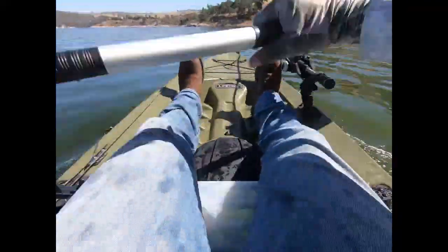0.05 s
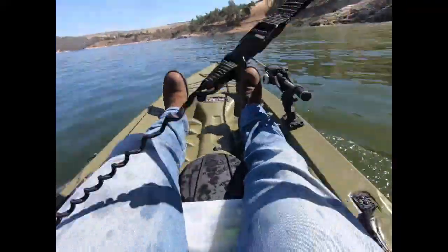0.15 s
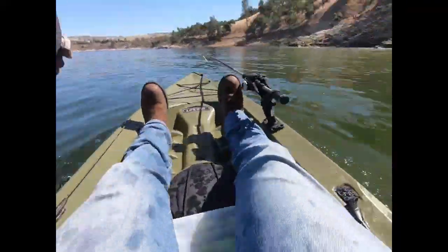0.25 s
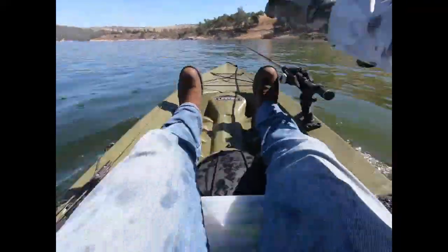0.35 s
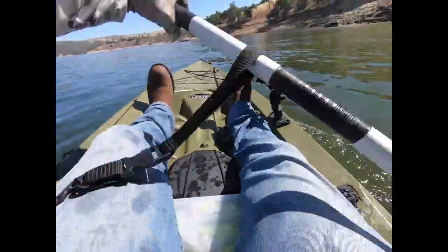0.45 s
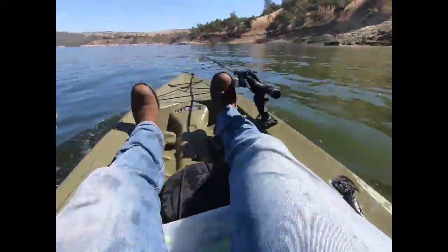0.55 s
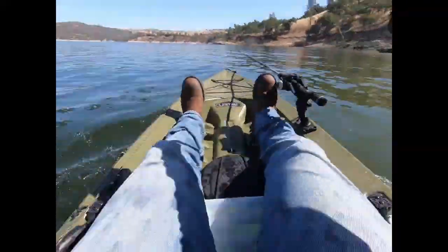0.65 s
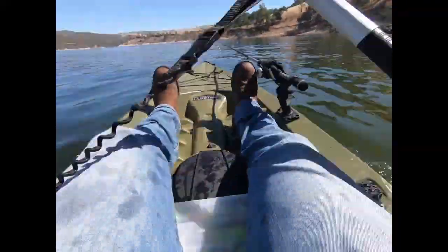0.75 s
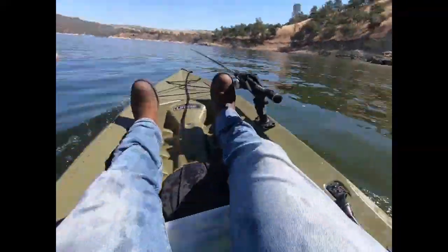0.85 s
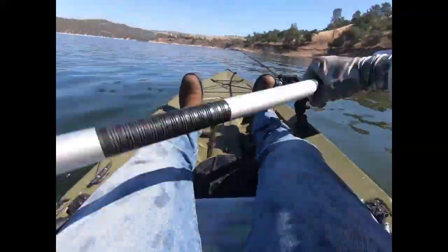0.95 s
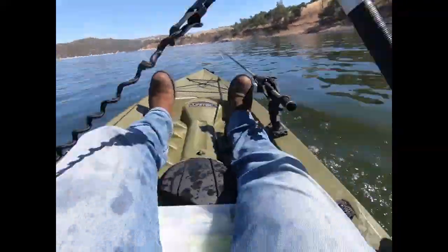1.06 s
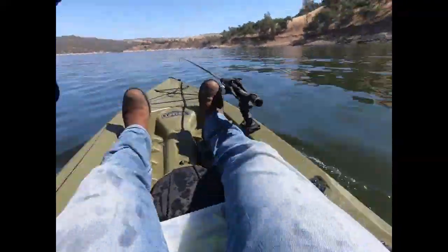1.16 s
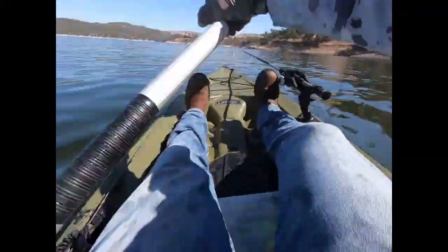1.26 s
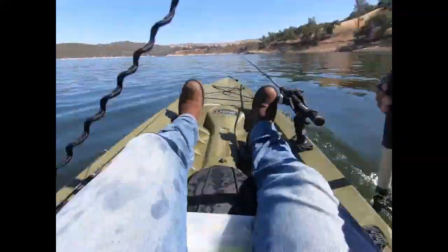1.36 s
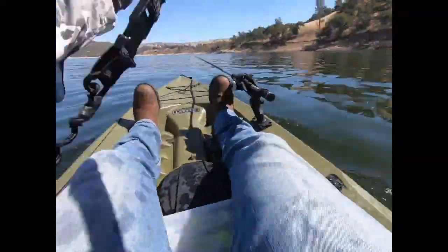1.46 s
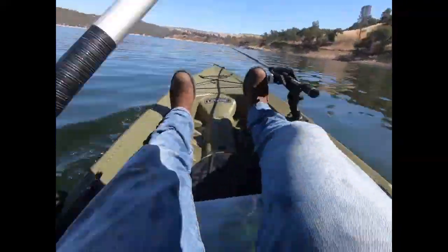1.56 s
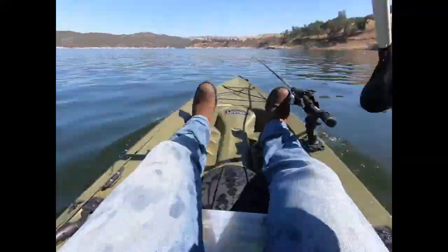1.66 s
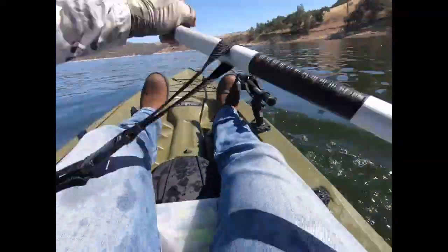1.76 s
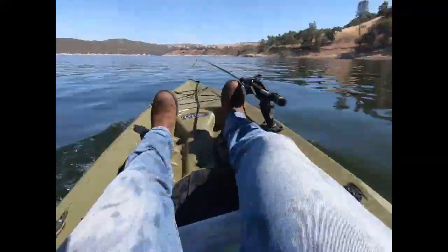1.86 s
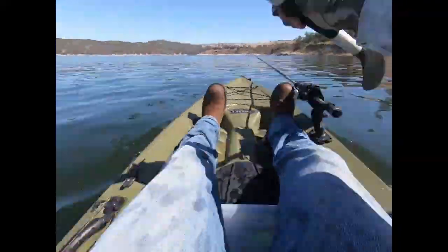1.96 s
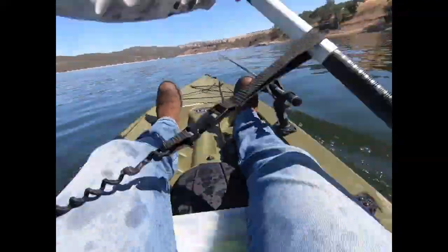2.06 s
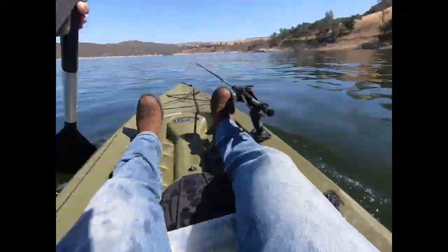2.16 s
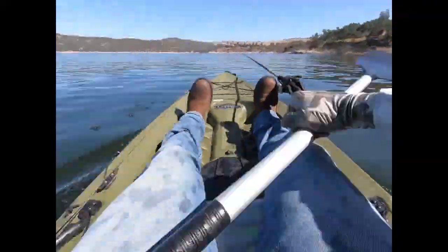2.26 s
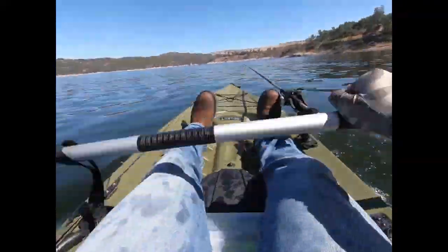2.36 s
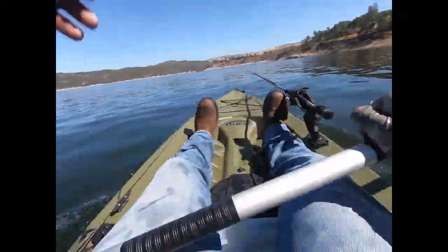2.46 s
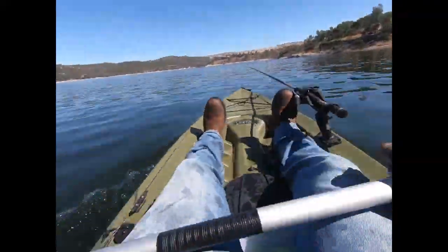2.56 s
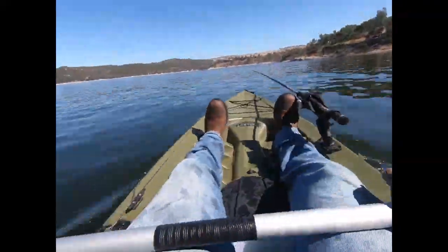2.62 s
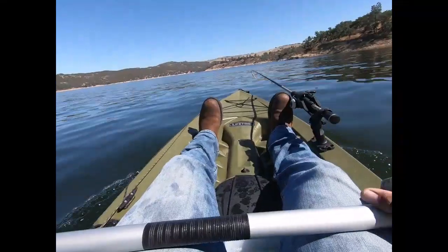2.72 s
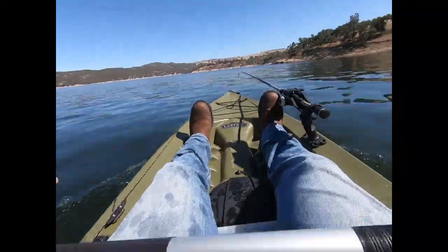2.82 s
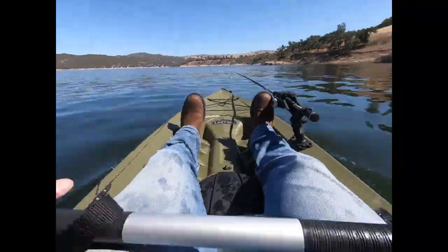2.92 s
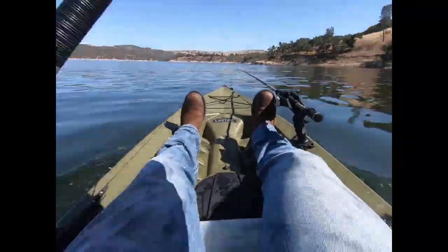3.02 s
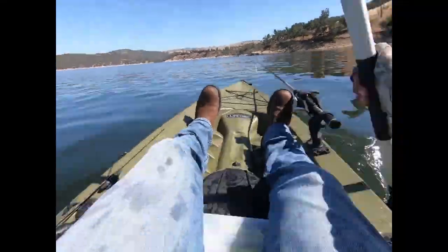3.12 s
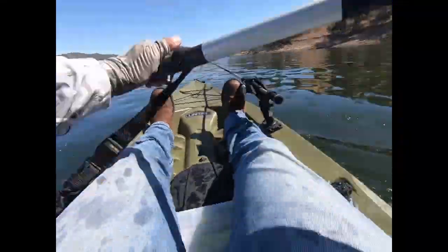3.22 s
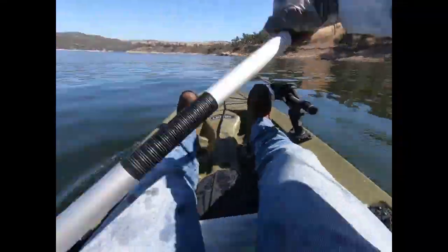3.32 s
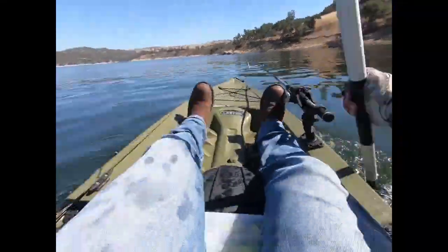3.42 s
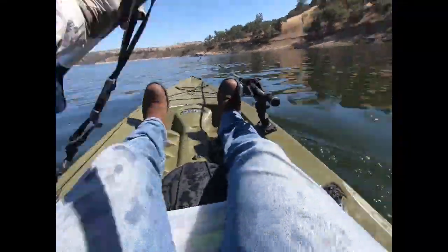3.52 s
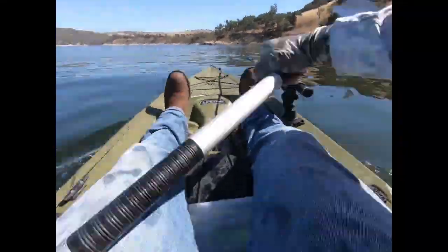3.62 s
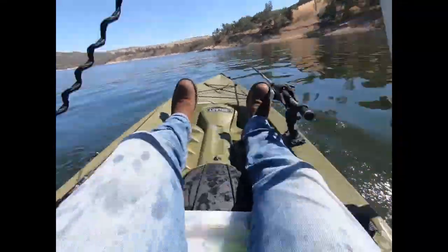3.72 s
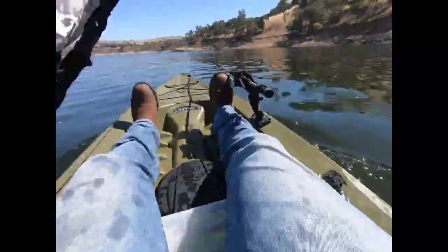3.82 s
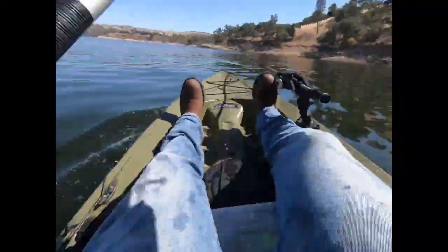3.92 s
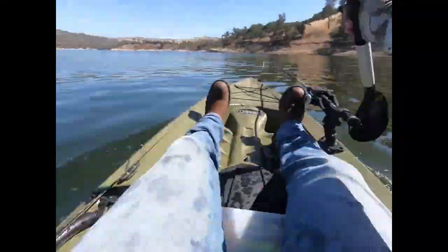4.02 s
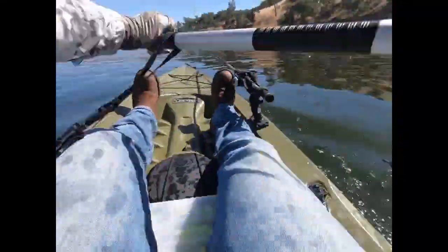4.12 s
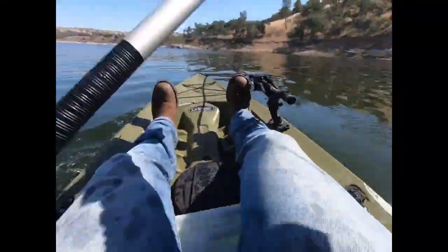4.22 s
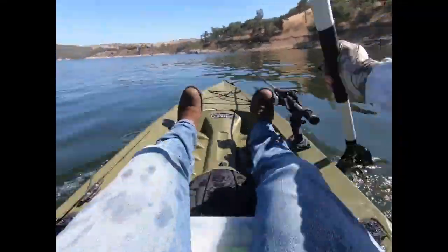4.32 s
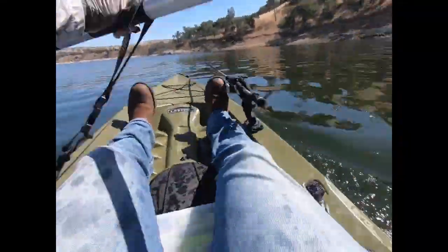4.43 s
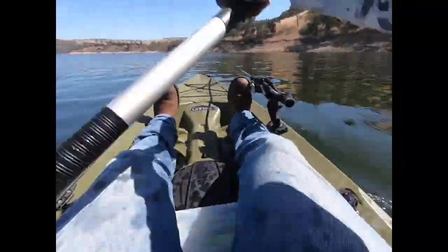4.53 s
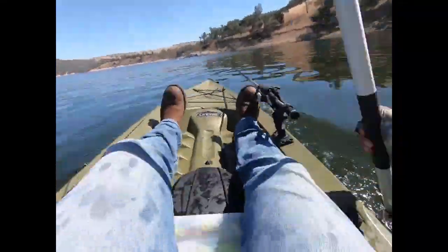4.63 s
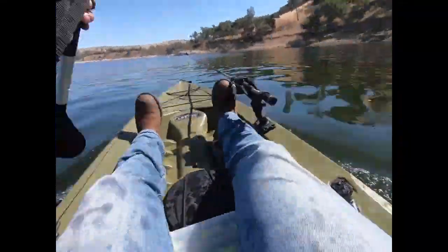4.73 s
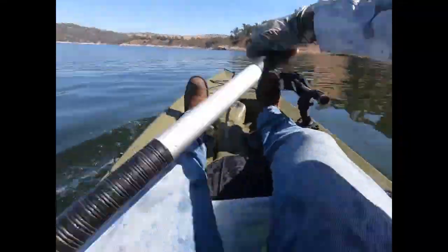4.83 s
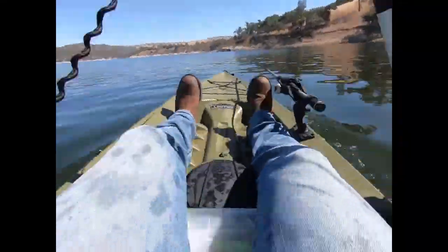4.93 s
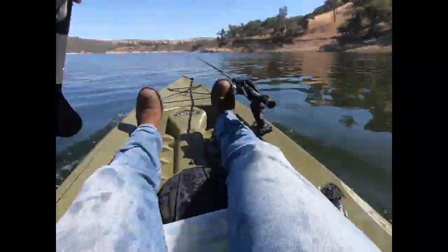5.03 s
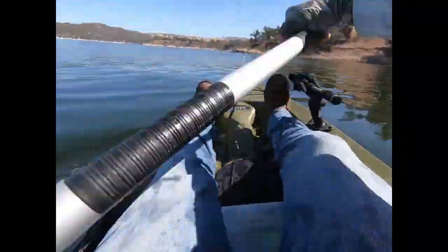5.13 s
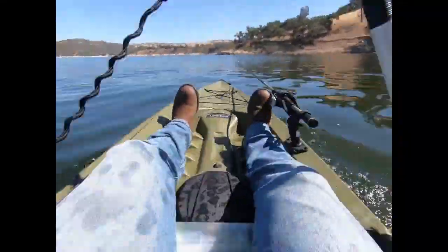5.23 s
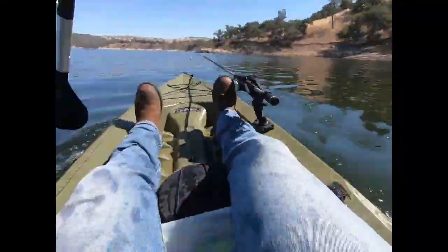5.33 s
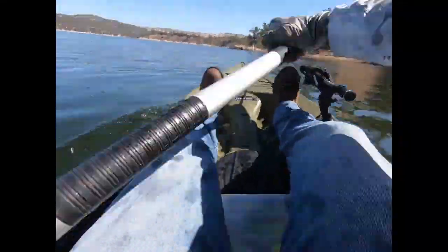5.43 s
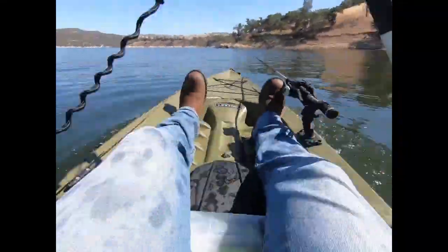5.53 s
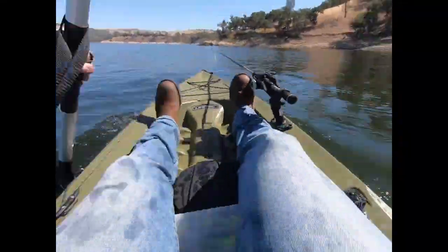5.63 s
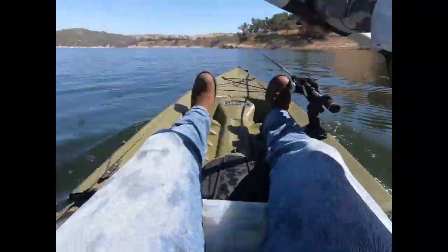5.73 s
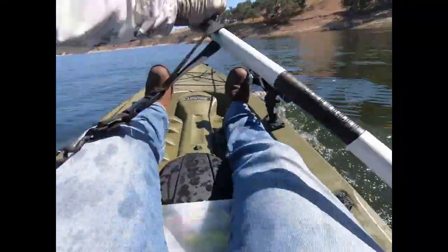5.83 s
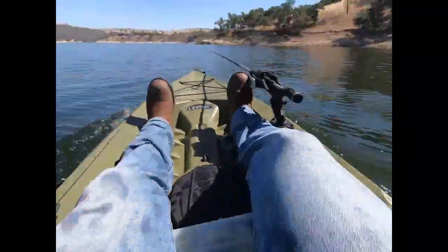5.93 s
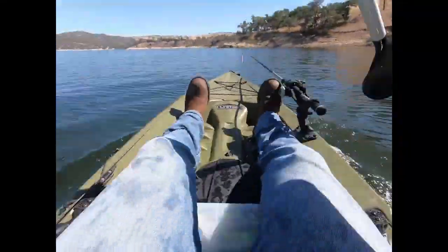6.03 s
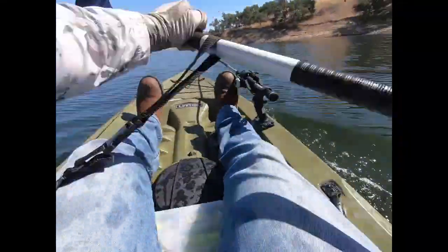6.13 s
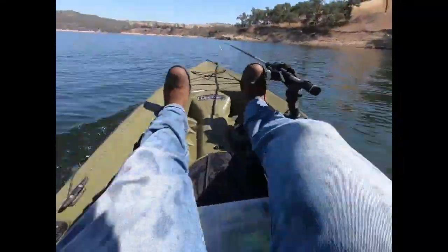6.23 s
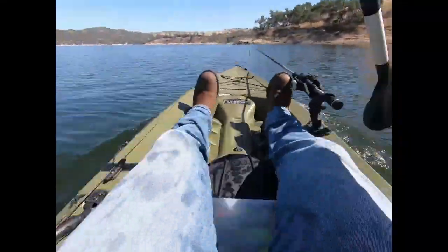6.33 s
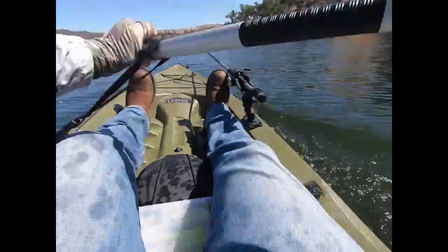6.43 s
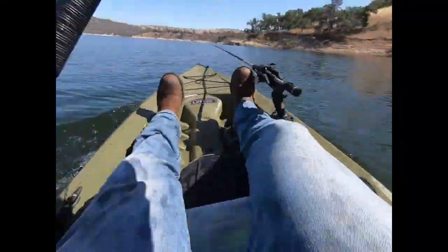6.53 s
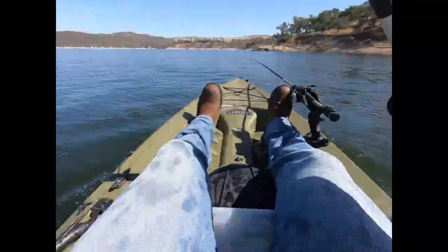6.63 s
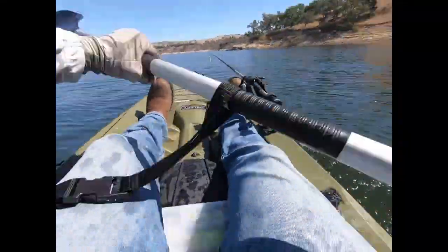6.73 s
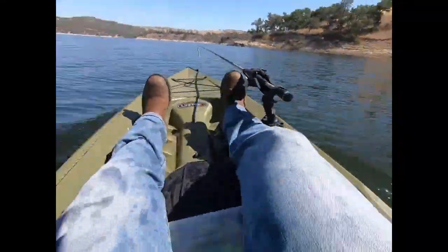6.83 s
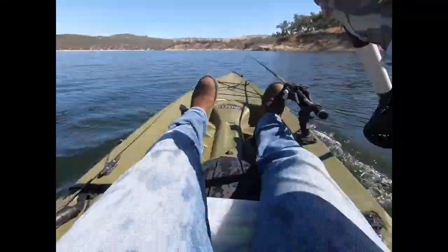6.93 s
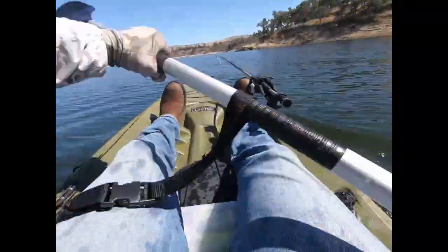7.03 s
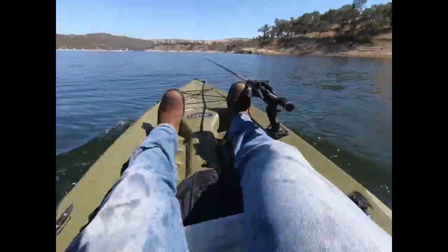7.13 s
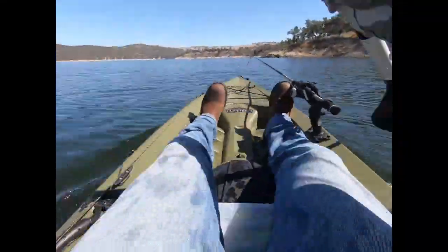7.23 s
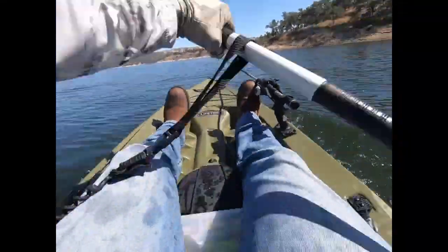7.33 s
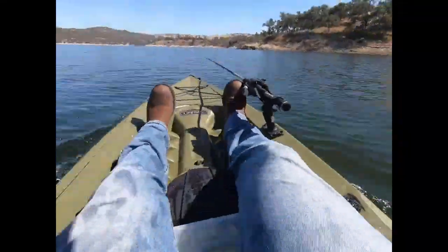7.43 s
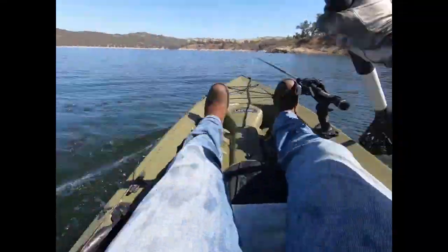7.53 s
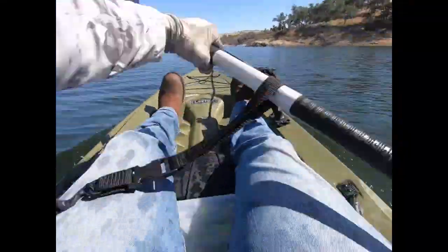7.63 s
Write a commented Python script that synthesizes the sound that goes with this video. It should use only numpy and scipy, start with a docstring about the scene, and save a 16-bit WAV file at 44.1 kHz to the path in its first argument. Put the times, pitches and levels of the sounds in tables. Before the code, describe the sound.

A close, body-worn microphone on a moving kayak catches steady gurgling wash and fizzing spray in quick pulses. Short hollow slaps, bright droplet plinks, small sideways spits and low thumps follow irregularly. Activity thins before three seconds, picks up again, and swells near seven seconds with a faint rising whine over a barely audible hum, before the water settles back and the width reopens.

```python
"""A plastic kayak is paddled over a calm lake, heard from the paddler's chest.
At once wavelets slap the hollow hull (noise shaking ringing tones), drops splash (rising sines), bubbles fizz
(short rings) and water rushes (bands of noise); a faint hum of sines lies below. From about half a second air
gulps (sliding tones) near the middle, spray spits on either side, dull thumps (low noise) come mostly from the
left. Slaps pause from about 2 to 3 s. Before 6.4 s the stereo closes, a whine rises, it reopens after 7.1 s."""
import sys
import numpy as np
from scipy import signal
from scipy.fft import rfft, irfft, next_fast_len
from scipy.io import wavfile

SR = 44100
rng = np.random.default_rng(int(sys.argv[2]) if len(sys.argv) > 2 else 0)


def persist_wave(psi):
    """Save psi, clipped to +-1, as 16-bit WAV."""
    counts = np.round(np.clip(psi, -1, 1) * 32767).astype(np.int16)
    wavfile.write(sys.argv[1], SR, np.atleast_2d(counts).T)


N = 338247   # length in samples


def amp(db):
    """Turn decibels into a gain."""
    return 10 ** (np.asarray(db) / 20)


def rms_one(x):
    """Scale a sound to an average strength (rms) of 1."""
    return x / np.sqrt(np.mean(x ** 2) + 1e-20)


def in_time(rows):
    """Draw straight lines between the rows of a time table, one curve per column."""
    time_s, *columns = np.transpose(rows)
    return [np.interp(np.arange(N) / SR, time_s, column) for column in columns]


def at_hz(points, hz):
    """Read a table of levels at any pitch, with pitch on a logarithmic scale."""
    table_hz, table_db = np.array(points).T
    return np.interp(np.log(hz), np.log(table_hz), table_db)


def drift(rate):
    """A random curve of rms 1 that wanders faster for a higher rate (Hz): smoothed noise."""
    r = np.exp(-40 * np.pi * rate / SR)   # worked out on every 20th sample
    noise = rng.standard_normal(N // 20 + 4002)
    slow = signal.lfilter([1], [1, -2 * r, r * r], noise)[4000:]   # skip the filter's start
    return np.interp(np.arange(N) / 20, np.arange(len(slow)), rms_one(slow))


def ring(clicks, hz, t60):
    """Each click of height 1 sets off a sine of height 1 that falls by 60 dB in t60 seconds."""
    r = amp(-60 / (t60 * SR))
    w = 2 * np.pi * hz / SR
    return signal.lfilter([0, np.sin(w)], [1, -2 * r * np.cos(w), r * r], clicks + 1e-18)


def band(x, low_hz, high_hz):
    """Keep the pitches between two limits, with gentle edges."""
    limits = [low_hz, min(high_hz, .45 * SR)]
    return signal.sosfilt(signal.butter(2, limits, "band", fs=SR, output="sos"), x)


def add(out, s, sound):
    """Mix a short two-channel sound in at time s (seconds)."""
    i = int(s * SR)
    out[:, i:i + sound.shape[1]] += sound[:, :N - i]


def fade(t, t60, rise_s):
    """Rise quickly, then die away by 60 dB in t60 seconds."""
    return (1 - np.exp(-t / rise_s)) * amp(-60 * t / t60)


def bump(t, center_s, half_width_s):
    """A smooth bell-shaped swell of height 1."""
    return np.exp(-.5 * ((t - center_s) / half_width_s) ** 2)


# water slaps on the hull: time_s, level_db (relative), cavity_hz (where the pitch settles),
# decay_s (basic length, scaled for each part of the slap), crack_db (height of the bright crack)
SLAPS = [(0.049, -13, 696, 0.051, -22), (0.182, -6, 1420, 0.045, -6.5), (0.6196, -11.5, 1330, 0.044, -10),
         (0.9, -8, 1470, 0.025, -2), (0.961, -9.5, 880, 0.035, -13), (1.233, -4.5, 950, 0.033, -3),
         (1.275, -9.5, 680, 0.037, -15), (1.573, -7.5, 1156, 0.038, -3.5), (1.597, -8, 780, 0.027, -9),
         (1.908, -4, 1154, 0.039, -12), (2.203, -8, 1246, 0.028, -36), (3.309, -9, 906, 0.041, -10),
         (3.642, -21.5, 1450, 0.038, -12), (3.791, -19.5, 1390, 0.041, -36), (3.912, -3.5, 1200, 0.023, -6),
         (3.933, -8.5, 1700, 0.028, -7), (4.228, -16.5, 1130, 0.036, -9), (4.517, -10, 1256, 0.028, -4),
         (4.851, -11.5, 845, 0.023, -7), (5.433, -7, 774, 0.034, -8.5), (5.672, -8, 1254, 0.032, -6),
         (6.005, -4.5, 724, 0.03, -7), (6.278, -10.5, 1187, 0.04, -10), (6.406, -4, 1520, 0.039, -5),
         (6.528, -5, 1164, 0.051, -7), (6.583, -7.5, 1450, 0.014, -15), (6.846, -5, 846, 0.03, -4.5),
         (6.895, -7.5, 1300, 0.026, -26), (7.354, -8, 707, 0.045, -52)]
# ringing tones of the hull: pitch_hz (basic, shifted a little each time), level_db (relative), t60_s
HULL_TONES = [(760, -3, .025), (980, -6, .02), (1250, 0, .022), (1600, -6, .016), (2100, -5, .016),
              (2800, -7, .012), (3500, -10, .012)]
SAG, SAG_S = 0.761, 0.00188   # the cavity starts higher by this share and sinks with this time constant


def slaps():
    """A crack together with a short rush of water and shaken hull tones; an air cavity rings and sinks."""
    out, t = np.zeros((2, N)), np.arange(SR // 8) / SR
    for s, level_db, hz, decay_s, crack_db in SLAPS:
        water = rng.standard_normal((4, len(t)))
        blow = water[0] * fade(t, 2.28 * decay_s, 0.0001)
        # each slap wets another spot, so the hull answers a little differently
        strengths_db = rng.normal(0, 2.5, len(HULL_TONES))
        shifts = rng.uniform(.94, 1.06, len(HULL_TONES))
        hull = sum(amp(tone_db + own_db) * ring(blow, tone_hz * shift, t60)
                   for (tone_hz, tone_db, t60), own_db, shift in zip(HULL_TONES, strengths_db, shifts))
        hull = band(hull, 560, 7900)
        cavity_hz = hz * (1 + SAG * np.exp(-t / SAG_S))
        cavity = np.sin(2 * np.pi * np.cumsum(cavity_hz) / SR) * fade(t, 1.8 * decay_s, 0.0014)
        rush = water[2:] * fade(t, 0.62 * decay_s, 0.00013)
        rush = band(band(rush, 540, 3800), 540, 3800)   # twice, for steeper edges
        crack_shape = fade(t, 0.0042, 0.00037) + 0.058 * fade(t, 0.18 * decay_s, 0.0003)
        crack = band(water[1], 2340, 7900) * crack_shape
        crack = crack / np.abs(crack).max() * [[1], [.5]]
        body = rms_one(hull) + amp(1.0) * rms_one(rush[0]) + amp(-3.5) * rms_one(cavity)
        # mid, then side
        body = np.array([body, 0.18 * body + 0.47 * rms_one(rush[1])]) / np.abs(body).max()
        add(out, s - .0008, amp(level_db + 6.5) * body + amp(crack_db) * crack)
    return out


# splashes of drops: time_s, level_db (relative), pitch_hz (where the first drop starts)
SPLASHES = [(0.3234, -9, 2080), (0.534, -6.5, 2860), (0.692, -9, 3400), (1.008, -4, 3540),
            (1.338, -3.5, 3380), (1.492, -5.5, 2600), (1.704, -4.5, 2980), (1.731, -4.5, 3030),
            (2.076, -6, 3380), (2.254, -5, 1870), (2.303, -6, 2040), (2.361, -12, 3050),
            (2.394, -9.5, 2730), (2.411, -12.5, 2500), (2.511, -17, 4530), (2.65, -18, 4030),
            (2.777, -16.5, 3000), (3.046, -13.5, 1810), (3.377, -5, 2900), (3.494, -5.5, 3700),
            (3.546, -4, 2420), (4.1094, -8, 2060), (4.319, -7, 3540), (4.39, -8.5, 3000),
            (4.734, -13, 2840), (4.82, -6, 1900), (4.868, -11, 3080), (5.002, -11, 2010),
            (5.178, -0.5, 2980), (5.186, 0.5, 3030), (5.201, -9, 3260), (5.328, -3, 2420),
            (5.406, -6, 2930), (5.6176, -1.5, 2670), (5.7517, -7, 3220), (6.068, -7.5, 3330),
            (6.121, -5.5, 3180), (6.2507, -7.5, 2640), (6.354, -2.5, 3000), (6.3757, -4, 3200),
            (6.46, 0, 3500), (6.5654, -3.5, 1640), (6.88, -4, 1330), (7.018, -12, 3000), (7.078, -3, 3020),
            (7.169, -9, 2300), (7.331, -3, 2670), (7.5386, -4.5, 3340)]
SPLASH_S = 0.032   # the later drops of one splash start within this time


def splashes():
    """One drop pings first, ten weaker ones scatter behind it, each rising in pitch, in a puff of spray."""
    out, t = np.zeros((2, N)), np.arange(SR // 10) / SR
    for s, level_db, hz in SPLASHES:
        late, pitch, size, place = rng.random((4, 11, 1))
        later = np.arange(11)[:, None] > 0   # all but the first drop
        age = np.maximum(t - later * late * SPLASH_S, 0)
        drop_hz = hz * 2 ** (later * 0.88 * (pitch - .4))
        pings = np.sin(2 * np.pi * drop_hz * age * (1 + 9.3 * age)) * fade(age, 24.0 / drop_hz, 0.00025)
        pings = amp(later * (-9.0 - 16.0 * size)) * pings
        drops = np.array([pings.sum(0), (pings * np.sign(place - .5)).sum(0)])   # mid, side
        spray = band(rng.standard_normal((2, len(t))), 0.34 * hz, 10000) * fade(t, 1.36 * SPLASH_S, 0.017)
        # the first impact
        tick = band(rng.standard_normal((2, len(t))), 1200, 7200) * bump(t, .003, 0.0013)
        splash = amp(-2.5) * drops + amp(-5.5) * spray + amp(-10) * tick
        add(out, s - .0008, amp(level_db) * splash)
    return out


# gulps of trapped air: start_s, level_db (relative), first_hz, last_hz, t60_s
GULPS = [(0.468, -9, 1390, 1280, 0.053), (0.7798, -12, 1410, 1020, 0.06), (0.8042, -5.5, 716, 506, 0.034),
         (1.197, -24, 1150, 1320, 0.08), (1.427, -19.5, 1405, 1170, 0.085),
         (7.179, -16.5, 1804, 1002, 0.08)]


def gulps():
    """A rough tone that slides from its first pitch to its last while it dies, inside a dull splash."""
    out, t = np.zeros((2, N)), np.arange(SR // 8) / SR
    for s, level_db, first_hz, last_hz, t60 in GULPS:
        hz = last_hz + (first_hz - last_hz) * np.exp(-t / (0.109 * t60))
        rough, splash = band(rng.standard_normal((2, len(t))), 66, 1470)
        tone = (1 + 2.5 * rough) * np.sin(2 * np.pi * np.cumsum(hz) / SR)
        gulp = band((tone + 1.2 * splash) * fade(t, t60, 0.0002), 417, 6500)
        add(out, s, amp(level_db) * gulp * [[1], [.9]])
    return out


# single drops of spray on the deck: time_s, level_db (before panning), pitch_hz, left_minus_right_db
SPITS = [(0.471, -17, 3730, -16), (0.5336, -13, 4610, -24), (0.6876, -15.5, 6140, 11),
         (0.7103, -15.5, 2500, -2.0), (0.7752, -15, 2720, -7), (1.1773, -16, 5800, -26.5),
         (1.9932, -15, 6200, 11), (3.255, -22, 4930, -25), (3.346, -14, 6700, 5),
         (4.1664, -24.5, 6600, -44), (4.2446, -15, 4830, -5), (4.396, -18, 5600, -15),
         (4.890, -12, 7500, 9), (4.4937, -15, 3440, -12), (4.7131, -14, 4500, -13), (5.02, -19, 6360, -30),
         (6.3237, -14, 4600, -15), (6.771, -8.5, 6440, 7), (7.237, -8, 5370, 12)]
SPIT_S = 0.0013   # half width of one spit


def spits():
    """A few milliseconds of noise around one pitch that swell and die alike, each from its own side."""
    out, t = np.zeros((2, N)), np.arange(SR // 50) / SR
    for s, level_db, hz, pan_db in SPITS:
        burst = rng.standard_normal(len(t)) * bump(t, .006, SPIT_S)
        burst = band(burst, 0.94 * hz, 1.02 * hz) + 1.1 * band(burst, 0.66 * hz, 8800)
        sides = amp([[pan_db / 2], [-pan_db / 2]])
        add(out, s - .0045, amp(level_db) * sides * burst / np.abs(burst).max())
    return out


# levels of the wash along the hull before the swells: time_s, gurgle_db, fizz_db, spray_db
WASH = [(0.0, -32, -35.5, -42), (0.17, -31, -33.5, -36), (1.47, -30.5, -32, -36.5),
        (2.3, -28.5, -31.5, -35), (2.47, -34.5, -35, -43), (2.86, -31.5, -43.5, -46.5),
        (3.05, -31.5, -39, -38), (3.22, -31, -36, -34), (3.67, -32.5, -32.5, -37), (5.75, -29, -30.5, -36),
        (5.98, -30.5, -31.5, -34.5), (6.37, -29.5, -31, -37.5), (6.75, -21, -26, -35.5),
        (7.03, -24, -26.5, -35.5), (7.33, -30, -31.5, -39.5), (7.67, -28.5, -31, -35)]
# spray swells up again and again in regular trains: first_s, end_s, gap_s, rise_db (before the accent)
SPRAY = [(0.043, 0.3, 0.24, 6), (0.575, 0.9, 0.12, 2.5), (1.114, 1.7, 0.19, 4), (1.802, 2.35, 0.16, 3),
         (2.51, 3.0, 0.19, 3), (3.245, 4.0, 0.15, 4.5), (4.169, 4.66, 0.14, 5.5), (4.736, 5.1, 0.14, 5.5),
         (5.173, 5.5, 0.13, 4), (5.603, 6.2, 0.14, 6), (6.312, 6.7, 0.17, 2.5), (6.766, 7.15, 0.19, 3),
         (7.213, 7.67, 0.14, 5.5)]
SWELL_S = 0.02   # half width of one swell
ACCENT = 0.58   # from the first, every second swell is stronger by this share, the others weaker


def water_levels(share):
    """Gurgle, fizz and spray in dB; each swell lifts the spray most and the gurgle least."""
    gurgle_db, fizz_db, spray_db = in_time(WASH)
    t = np.arange(0, N, 50) / SR   # every 50th sample is enough
    swell_db = sum(rise_db * (1 + ACCENT * (-1) ** k) * bump(t, s, SWELL_S)
                   for first_s, end_s, gap_s, rise_db in SPRAY
                   for k, s in enumerate(np.arange(first_s, end_s, gap_s)))
    swell_db = share * np.interp(np.arange(N) / SR, t, swell_db)
    return gurgle_db + 0.62 * swell_db, fizz_db + 0.92 * swell_db, spray_db + swell_db


# tone colour of the rushing water: pitch_hz, level_db (relative)
WATER_COLOUR = [(50, -20), (206, -20.5), (376, -17.5), (423, 5), (585, -2.5), (849, -10), (953, -6),
                (1070, -1.5), (2840, 1), (15500, -13.5)]
WASH_SWELLS = .65   # share of each swell that the rushing noise follows


def wash():
    """Half-octave bands of rushing noise, roughened by random flutter; mid and side unrelated."""
    gurgle_db, fizz_db, spray_db = water_levels(WASH_SWELLS)
    out, edges = 0, 30 * 2 ** np.arange(0, 9.6, .5)
    surge, patter = drift(30.0), drift(33.0)   # shared by all bands
    white = rng.standard_normal((2, 2, N))   # neighbouring bands use different noise
    for k, (low_hz, high_hz) in enumerate(zip(edges, edges[1:])):
        hz = np.sqrt(low_hz * high_hz)
        level_db = gurgle_db if hz < 2000 else fizz_db if hz < 6000 else spray_db
        own_db = 1.6 if hz > 300 else 4.0   # the rumble is lumpier
        swing_db = level_db - level_db.mean() + 0.6 * surge + 2.65 * patter + own_db * drift(21.0)
        out = out + amp(at_hz(WATER_COLOUR, hz) + swing_db) * band(white[k % 2], low_hz, high_hz)
    return amp(-30.0) * out / np.sqrt(np.mean(out[0] ** 2))


def clumped_births(sizes, per_s, clump_db, slow_hz, fast_hz):
    """Clicks at random moments, more likely while two random drifts run high."""
    chance = per_s * amp(clump_db * (drift(slow_hz) + drift(fast_hz))) / SR
    return sizes * (rng.random(N) < chance)


def bubbles(level_db, per_s, low_hz, high_hz, cycles, uneven_db, clump_db):
    """Bubbles come in clumps of like size, each ringing a few cycles somewhere else around the boat."""
    sizes = amp(uneven_db * np.minimum(rng.exponential(1, N), 4)) * rng.choice([-1, 1], N)
    born = clumped_births(sizes, per_s, clump_db, 10, 40)
    born = np.array([born, born * rng.choice([-1, 1], N)])   # mid, side
    # a drifting choice among 16 pitches keeps neighbours alike
    dealt = np.round(7 + 3.5 * drift(18) + rng.normal(0, 1.8, N)) % 16
    pitches = np.geomspace(low_hz, high_hz, num=16)
    rings = sum(ring(born * (dealt == k), hz, cycles / hz) for k, hz in enumerate(pitches))
    return amp(level_db) * rms_one(band(rings, 0.47 * low_hz, 21000))


def crackle(level_db, per_s, low_hz, high_hz, burst_s, uneven_db, clump_db):
    """Droplets break at random, in clumps: each a broad burst of noise a few milliseconds long."""
    sizes = amp(uneven_db * np.minimum(rng.exponential(1, N), 4))
    born = clumped_births(sizes, per_s, clump_db, 8, 30)
    bursts = signal.fftconvolve(born, np.hanning(int(burst_s * SR) + 3), "same")
    return amp(level_db) * rms_one(band(bursts * rng.standard_normal((2, N)), low_hz, high_hz))


# dull thumps: time_s, level_db (average strength before panning), pitch_hz, left_minus_right_db
THUMPS = [(0.486, -23.5, 480, 6), (0.522, -28, 270, 7), (0.813, -32.5, 440, -2), (1.579, -30, 427, 4),
          (2.593, -46, 333, 4), (3.502, -36, 298, 3), (4.034, -33, 360, 7), (5.121, -29, 270, 10.5),
          (5.364, -34.5, 262, 3), (5.493, -33.5, 400, 1), (5.895, -28, 320, 10.5), (6.269, -21, 348, 10),
          (6.272, -25.5, 810, 13), (7.427, -33.5, 350, 6)]
THUMP_S = 0.047   # length of one thump before filtering


def thumps():
    """Loose, lumpy bursts of low noise that swell and stop, left and right only partly alike."""
    out, t = np.zeros((2, N)), np.arange(SR // 8) / SR
    for s, level_db, hz, pan_db in THUMPS:
        swell = np.sin(np.pi * np.clip(t / THUMP_S, 0, 1)) ** 0.35
        # multiplying by slow noise makes it bubble
        noise = rng.standard_normal((2, len(t))) * rms_one(band(rng.standard_normal(len(t)), 20, 88))
        core = band((noise + noise[0]) * swell, 0.52 * hz, 2.06 * hz)
        lump = band(core + amp(-2.5) * noise * swell, 56, 1700)
        lump = lump / np.sqrt(np.sum(lump ** 2, 1, keepdims=True) / (THUMP_S * SR))
        add(out, s - .012, amp(level_db) * amp([[pan_db / 2], [-pan_db / 2]]) * lump)
    return out


# steady tones: pitch_hz (about 2.8 s in, before wavering), level_db (relative)
HUM = [(430.7, -52), (683.7, -49), (855.9, -47), (1077, -46), (1287, -50), (1400, -50), (1507, -48),
       (1707, -41)]
# loudness of all the steady tones together: time_s, level_db (relative)
HUM_LEVEL = [(0, -1.5), (3.2, -1.5), (4.5, -4.5), (6.3, -3.5), (6.8, 2.5), (7.67, -3.5)]
# a faint rising whine, before wavering: time_s, pitch_hz, level_db
WHINE = [(6.621, 1050, -34), (6.72, 1088, -22.5), (6.801, 1120, -40), (7.031, 1215, -29.5),
         (7.2, 1205, -41)]


def hum():
    """Steady, slightly wavering sine tones, and a broken one that rises for a moment."""
    t = np.arange(N) / SR
    waver = np.cumsum(1 + 0.0023 * drift(9.3) + 0.001201 * (t - 2.8)) / SR   # creeps up in pitch
    tones = sum(amp(db + 3.0 + 2 * drift(5)) * np.sin(2 * np.pi * (hz * waver + rng.random()))
                for hz, db in HUM)
    hz, db = in_time(WHINE)
    heard = np.clip(np.minimum(t - WHINE[0][0], WHINE[-1][0] - t) / 0.063, 0, 1)
    whine_level = heard * amp(db + 4 * drift(50))
    whine = whine_level * np.sin(2 * np.pi * np.cumsum(hz * (1 + .018 * drift(60))) / SR)
    return (amp(in_time(HUM_LEVEL)[0]) * tones + whine) * [[1], [.3]]


MONO_S = (6.36, 7.114)   # the stereo is fully closed from the first time, starts to open again at the second
MONO_FADE_S = (0.079, 0.38)   # how long closing takes (before the first time), how long opening takes


def spread():
    """How much of the left-right difference is heard: 1 is full stereo, 0 is the same on both sides."""
    t = np.arange(N) / SR
    closing = (MONO_S[0] - t) / MONO_FADE_S[0]
    opening = (t - MONO_S[1]) / MONO_FADE_S[1]
    return np.clip(np.maximum(closing, opening), 0, 1)


# gain of the side signal, which makes the width: pitch_hz, level_db
WIDTH = [(60, -8), (200, -8), (380, -12.5), (700, -14), (1290, -21.5), (2380, -20.5), (4400, -5.5),
         (8120, 2.5), (15000, 0)]
# balance between left and right: pitch_hz, left_minus_right_db
LEAN = [(1000, -0.5), (4000, -0.5), (8000, -3), (15000, 0)]


def scene():
    """Mix all sources; left and right are most alike in the middle pitches, less so in bass and treble."""
    gurgle_db, fizz_db, spray_db = water_levels(1)
    water = wash()
    water = water + bubbles(gurgle_db - 8.5, 450, 600, 2200, cycles=14, uneven_db=3.5, clump_db=3.5)
    water = water + bubbles(fizz_db - 3.0, 1000, 1900, 6000, cycles=24, uneven_db=6.0, clump_db=4)
    water = water + crackle(fizz_db - 10.5, 100, 1450, 7300, burst_s=0.0042, uneven_db=6.5, clump_db=2.5)
    water = water + crackle(spray_db - 7.0, 220, 6800, 14200, burst_s=0.0044, uneven_db=1.5, clump_db=4.0)
    size = next_fast_len(N + SR // 4)
    mid, side = rfft(water + slaps() + gulps() + splashes() + hum(), size)
    hz = np.maximum(np.arange(len(mid)) * SR / size, 1)
    side = side * amp(at_hz(WIDTH, hz))
    lean = amp(at_hz(LEAN, hz) / 2)
    stereo = irfft(np.array([(mid + side) * lean, (mid - side) / lean]), size)[:, :N]
    left, right = stereo + thumps() + spits()
    return (left + right) / 2 + spread() * (left - right) / 2 * [[1], [-1]]


CUTOFF_HZ = 16100   # almost nothing is heard above this


def record(dry):
    """Flatten peaks beyond full scale, then cut the very top of the treble steeply."""
    loud = np.clip(dry, -1, 1)
    low_pass = signal.cheby2(22, 50, CUTOFF_HZ, fs=SR, output="sos")
    return np.clip(signal.sosfilt(low_pass, loud), -1, 1)


dry = scene()
out = record(dry)
persist_wave(out)
```